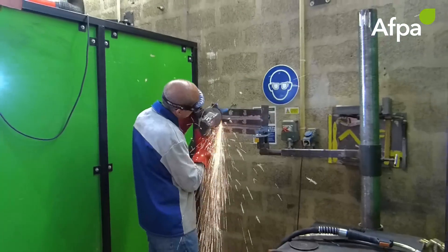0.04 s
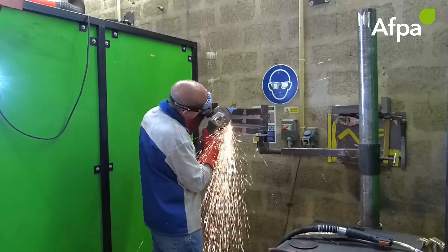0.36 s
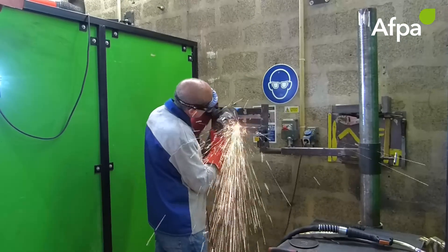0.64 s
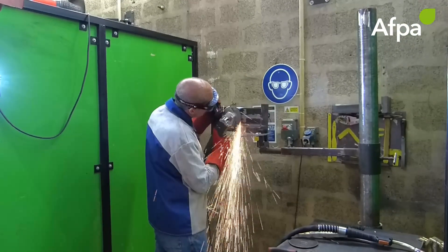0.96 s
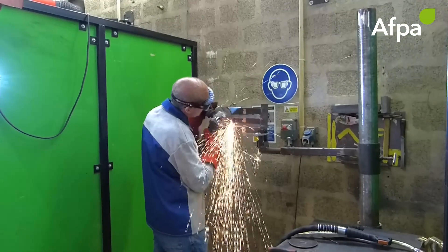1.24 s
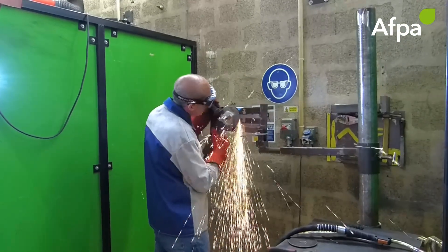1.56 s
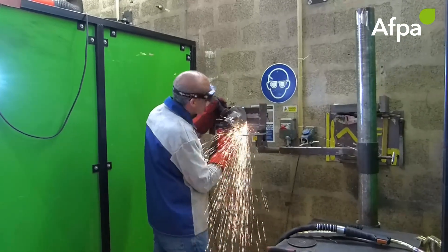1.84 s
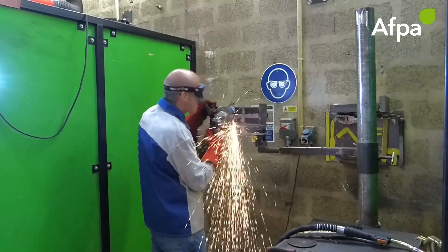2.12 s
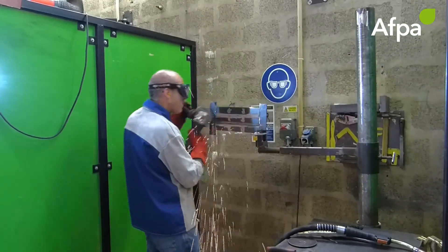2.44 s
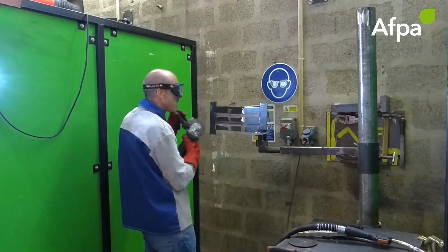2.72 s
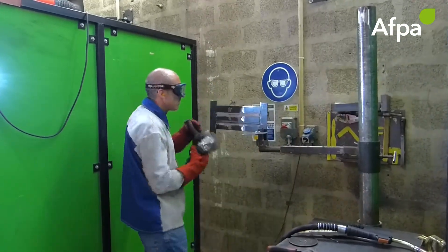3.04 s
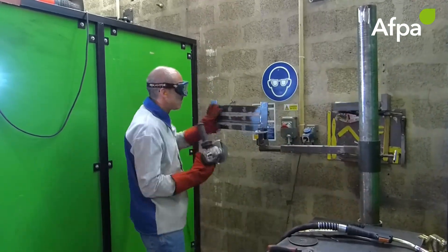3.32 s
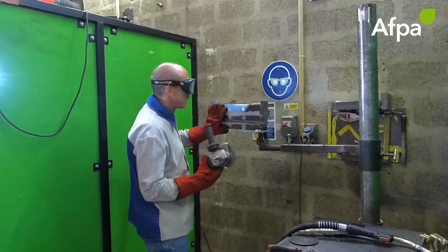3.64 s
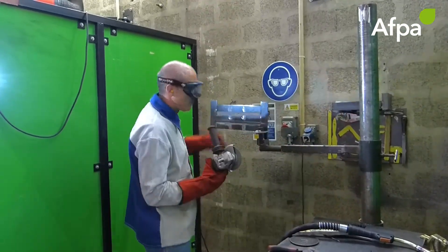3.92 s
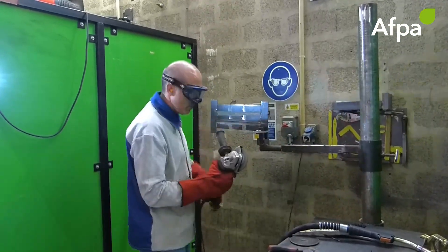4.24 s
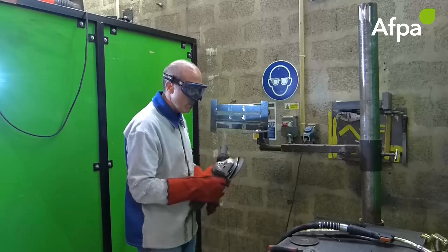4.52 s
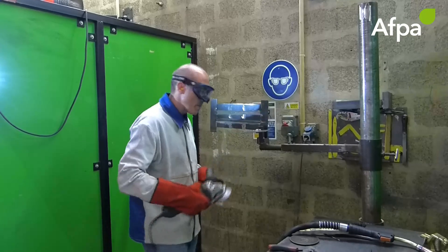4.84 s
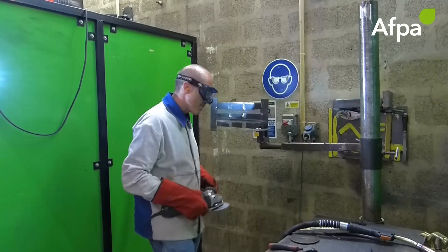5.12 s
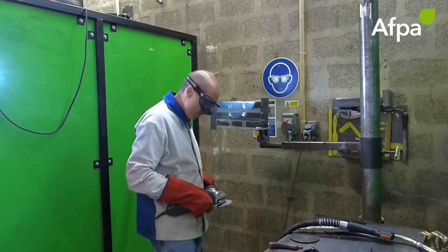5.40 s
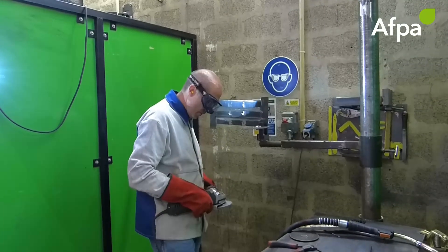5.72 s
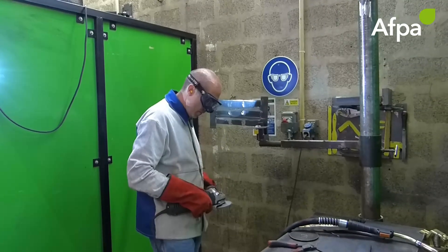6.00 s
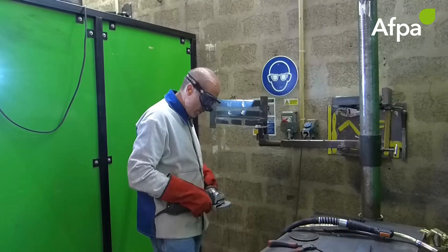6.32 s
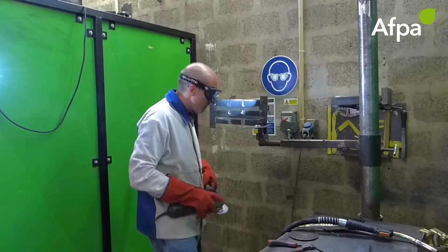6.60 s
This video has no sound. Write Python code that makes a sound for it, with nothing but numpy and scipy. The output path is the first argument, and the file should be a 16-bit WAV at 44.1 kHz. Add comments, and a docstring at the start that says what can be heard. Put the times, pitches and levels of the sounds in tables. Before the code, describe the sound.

Harsh grinding on metal in a workshop stops, and the grinder coasts down, whirring lower as its gears rattle and knock.

```python
"""An angle grinder bites into steel in a workshop with block walls. The disc scrapes once a turn, and its
harmonics (whole multiples of its speed) shriek in turn as the sagging speed slides them over the steel's
own notes. At 2.6 s it is lifted off and the steel rings out. Switched off, it coasts: fan air and gear
whine sink in pitch while the slack gears knock and rattle ever louder. Last, the worker shifts his grip."""
import sys
import numpy as np
from scipy import signal
from scipy.fft import rfft, irfft
from scipy.io import wavfile
from scipy.ndimage import map_coordinates

SR = 44100
rng = np.random.default_rng(int(sys.argv[2]) if len(sys.argv) > 2 else 0)


def transcribe(u):
    """Save the signal u as a 16-bit wav file named by the first command-line argument.

    u: samples, shape (n,) or (channels, n), limited to [-1, 1]; the rate is SR.
    q: integer samples, one column per channel.
    """
    v = np.clip(np.atleast_2d(u).T, -1, 1)
    q = np.round(v * 32767).astype(np.int16)
    wavfile.write(sys.argv[1], SR, q)


N = 302526
TIME = np.arange(N) / SR
LIFT_S, OFF_S = 2.587, 2.765  # the disc leaves the steel; the motor is switched off
TOUCHING, SINCE_LIFT = TIME < LIFT_S, np.maximum(TIME - LIFT_S, 0)


def amp(db):
    """Turns decibels into a gain."""
    return 10 ** (np.asarray(db) / 20)


def unit(x):
    """Scales a signal to an average power of 1."""
    return x / np.sqrt(np.mean(x ** 2) + 1e-20)


def curve(rows, column=1):
    """One column of a table, joined by straight lines in time."""
    rows = np.asarray(rows)
    return np.interp(TIME, rows[:, 0], rows[:, column])


def level_at(points, hz):
    """Looks up the level at a pitch, between the rows of a table."""
    pitches, levels = np.transpose(points)
    return np.interp(np.log(hz + 1), np.log(pitches), levels)


def colour(x, points, bumps=()):
    """Makes some pitches louder and others softer: a broad outline with narrow bumps on top."""
    hz = np.fft.rfftfreq(N, 1 / SR)
    bumps_db = sum(db / (1 + (2 * (hz - pitch) / width) ** 2) for pitch, width, db in bumps)
    return irfft(rfft(x) * amp(level_at(points, hz) + bumps_db), N)


def drift(rate_hz):
    """A smooth random wobble, about 1 in size."""
    coarse = np.arange(0, N + 48, 48)
    smooth = map_coordinates(rng.standard_normal(len(coarse)), [coarse / SR * rate_hz * 2], mode="wrap")
    return unit(np.interp(np.arange(N), coarse, smooth))


def resonate(x, hz, t60):
    """Rings at one pitch when pushed; t60 is the seconds it takes to fade by 60 dB."""
    r = amp(-60 / (t60 * SR))
    return signal.lfilter([1, 0, -1], [1, -2 * r * np.cos(2 * np.pi * hz / SR), r * r], x)


def room(x, t60, wet):
    """Dense echoes from the block walls; wet is their share of the power."""
    t = np.arange(SR // 2) / SR
    tail = rng.standard_normal(len(t)) * amp(-60 * t / t60) * (t > .004)
    return np.sqrt(1 - wet) * x + np.sqrt(wet) * signal.oaconvolve(x, tail / np.linalg.norm(tail))[:N]


def wander(x, depth_db=1.8, span_hz=200, span_s=0.07):
    """Random patches of the sound, high and low, brighten and dull."""
    hz, t, spectrum = signal.stft(x, SR, nperseg=1024, noverlap=768)
    field = rng.uniform(-1, 1, (256, 256))
    grid = np.meshgrid(hz / span_hz, t / span_s, indexing="ij")
    patches = unit(map_coordinates(field, grid, order=1, mode="wrap"))
    return signal.istft(spectrum * amp(depth_db * patches), SR, nperseg=1024, noverlap=768)[1][:N]


def swell(peak_s, length_s):
    """The samples around peak_s, and a gain that builds up and dies away over them."""
    near = np.flatnonzero(abs(TIME - peak_s) < 3 * length_s)
    return near, 1 / np.cosh(2.2 * (TIME[near] - peak_s) / length_s)


# How fast the disc spins while it grinds: time_s, turns_per_s
LOADED_SPEED = [(0.0, 141.0), (0.13, 141.9), (0.42, 141.3), (0.53, 140.2), (0.62, 139.9), (0.97, 137.9),
                (1.29, 137.0), (1.45, 137.6), (1.72, 135.8), (1.86, 135.3), (2.1, 137.3), (2.26, 136.4),
                (2.45, 134.8), (2.58, 135.4)]

def disc_speed(drag_s=4.78, friction_per_s=11.76):
    """Turns per second: the load sags the speed; after switch-off, drag and friction run it down."""
    friction = friction_per_s * drag_s
    return (curve(LOADED_SPEED) + friction) * np.exp(-np.maximum(TIME - OFF_S, 0) / drag_s) - friction


# The high hiss and the low bark of the scrape: time_s, level_db
HISS = [(0.0, -12), (0.08, -25.5), (0.11, -22.5), (0.16, -21), (0.25, -20.5), (0.85, -19.5), (0.95, -22),
        (1.31, -20), (1.39, -22), (1.57, -21), (1.85, -21.5), (2.04, -21.5), (2.12, -20), (2.58, -23.5)]
BARK = [(0.0, -23.5), (0.19, -32.5), (0.58, -24), (0.8, -38), (0.91, -32), (1.29, -27.5), (1.32, -30),
        (1.59, -29), (1.78, -27), (1.9, -26.5), (2.13, -25.5), (2.58, -29.5)]
# How the disc meets the steel: time_s, growl_db, repeating_share (of the scrape, 0 to 1)
CONTACT = [(0, -68.5, 0.73), (.45, -69, 0.32), (.75, -82, 0.82), (1, -56, 0.3), (1.35, -66, 0.85),
           (1.65, -62, 0.7), (1.95, -67.5, 0.26), (2.3, -71, 0.65), (2.6, -69, 0.03)]
# The tone of the scrape: pitch_hz, level_db
SCRAPE_TONE = [(100, -41), (330, -47), (490, -65), (570, -50), (750, -27), (1200, -15.5), (1600, -12.5),
               (2000, -5), (3300, -7), (5000, 4.5), (6700, 2.5), (8500, 2.5), (9700, -2.5), (11500, -5.5),
               (15000, -22.5)]
# Pitches that the disc and its guard boost or swallow: pitch_hz, width_hz, boost_db
DISC_BUMPS = [(1650, 200, -29), (2425, 120, -9.5), (2740, 190, 6.5), (3330, 110, -10), (4340, 110, 1.5),
              (4810, 110, -6), (4840, 170, 4.5), (5430, 110, 3.5), (5820, 80, 6.5), (6635, 620, 9),
              (8150, 740, 8), (8450, 250, -4), (9310, 970, 6.5), (9810, 92, 3)]

def scrape(turns, wear_s=0.1169, split_hz=3800):
    """Grit tears at the steel; the same rough rim returns each turn while wear slowly renews it."""
    harmonics = np.exp(2j * np.pi * rng.random((256, 160)))  # all equally strong
    patterns = unit(irfft(harmonics, 2560, axis=1))  # each row is once round the rim
    place = (turns % 1 * patterns.shape[1]).astype(int)
    age = TIME / wear_s
    step, blend = age.astype(int), np.pi / 2 * (age % 1)
    rim = np.cos(blend) * patterns[step, place] + np.sin(blend) * patterns[step + 1, place]
    repeating = curve(CONTACT, column=2)
    grit = np.sqrt(repeating) * rim + np.sqrt(1 - repeating) * rng.standard_normal(N)
    grit *= (1 + 0.1 * np.cos(2 * np.pi * turns)) * amp(1.8 * drift(45) + 0.2 * drift(6.25))
    grit = wander(room(grit, t60=0.24, wet=0.7))  # the point of contact wanders
    grit = colour(grit, SCRAPE_TONE, DISC_BUMPS)
    low = signal.sosfiltfilt(signal.butter(3, split_hz, fs=SR, output="sos"), grit)
    hiss = amp(curve(HISS) - 1.35) * unit(grit - low)
    bark = amp(curve(BARK) - 1.6) * unit(low)
    last_bite_db = 2 * np.exp(-((TIME - 2.54) / 0.022) ** 2)
    return (hiss + bark) * amp(last_bite_db - 60 * SINCE_LIFT / 0.61)


# The notes at which the steel and its clamp ring: pitch_hz, level_db, fade_s
STEEL_NOTES = [(1099, -49, .35), (1386, -48.5, .22), (1770, -48.5, 1.2), (2600, -43, .25), (2695, -41, .18),
               (2942, -44, .45), (3305, -47, .4), (3420, -46, .35), (3752, -42, .28), (4200, -47, .15),
               (4690, -43.5, 1.0), (5042, -43, .35), (5572, -44, .4), (6446, -41, .4), (6530, -40, .45),
               (6660, -37, .17), (7079, -43, .3), (7628, -45, .3), (8266, -41, .35), (8642, -41, .6),
               (9743, -42, .4)]

def steel_ring(push):
    """The grit's random pushes keep all the steel's notes ringing."""
    out, force = np.zeros(N), push * rng.standard_normal(N)
    for hz, db, t60 in STEEL_NOTES:
        note = resonate(force, hz, t60)
        out += amp(db) * note / note[TOUCHING].std()
    return amp(-1) * out


# The low tones of the growl: speed_multiple, relative_db
GROWL_TONES = [(1, -24), (2, -3), (3, -3), (4, 8.5), (6, 7), (8, 17.5), (10, 6)]

def growl(turns):
    """The harder the disc is pressed, the more it growls."""
    tones = sum(amp(db + 0.5 * drift(5.5)) * np.sin(2 * np.pi * k * turns) for k, db in GROWL_TONES)
    return tones * amp(curve(CONTACT) - 220 * SINCE_LIFT)


# How hard the disc's harmonics drive a note that they meet: pitch_hz, boost_db
SHRIEK_DRIVE = [(1100, -9), (1400, 4), (1800, 10.5), (2700, -0.5), (3400, 8), (3750, 0), (4200, 1),
                (5200, 14), (6600, 3), (9700, 6.5)]

def shrieks(speed, turns, push, damping_hz=7, slip_turns=0.005):
    """A note of the steel shrieks when a harmonic slides onto it; the roaming contact damps it."""
    out, loaded, span = np.zeros(N), speed[TIME < OFF_S], TIME < OFF_S + .5
    angle = 2 * np.pi * (turns + slip_turns * drift(30))[span]
    roam, flutter = amp(5 * drift(7.1))[span], amp(0.5 * drift(60))[span]
    for hz, db, t60 in STEEL_NOTES:
        multiples = range(round(hz / loaded.max()), round(hz / loaded.min()) + 1)
        shift, phase = rng.integers(N), 2 * np.pi * rng.random()
        force = push[span] * np.roll(roam, shift) * sum(np.sin(k * (angle + phase)) for k in multiples)
        width_hz = np.log(1000) / (np.pi * t60) + damping_hz
        note = np.pi * width_hz / SR * resonate(force, hz, t60=np.log(1000) / (np.pi * width_hz))
        out[span] += np.sqrt(2) * amp(db + level_at(SHRIEK_DRIVE, hz)) * np.roll(flutter, shift) * note
    return out


# Rough squeals of the rim on the steel: peak_s, length_s, pitch_hz, level_db
CHATTERS = [(0.043, 0.085, 2956, -35), (.05, 0.074, 8620, -24.5), (0.08, 0.065, 4230, -29),
            (0.074, .03, 6660, -19.5), (0.094, .04, 2700, -36), (0.134, 0.078, 3730, -29.5),
            (0.192, 0.069, 6590, -24.5), (0.253, 0.053, 3750, -31), (.45, 0.22, 3740, -33),
            (0.517, 0.16, 2640, -28), (0.575, .025, 3770, -33), (0.626, 0.041, 8310, -22.5),
            (.86, 0.083, 6650, -22.5), (1.09, 0.029, 6660, -29), (1.161, 0.028, 8260, -23.5),
            (1.24, 0.049, 6720, -30), (1.28, 0.022, 5050, -25), (1.445, 0.059, 3790, -30.5),
            (1.627, 0.057, 4220, -30), (1.805, 0.13, 6680, -22), (1.826, 0.066, 2650, -31.5),
            (1.85, 0.16, 5610, -27), (1.856, .06, 5000, -31), (2.026, 0.36, 2950, -36),
            (2.105, 0.027, 5050, -25.5), (2.134, 0.1, 6560, -24), (2.18, 0.047, 3770, -30),
            (2.3, 0.073, 8400, -24.5), (2.37, 0.03, 8010, -22.5), (2.46, 0.026, 3740, -27),
            (2.453, 0.037, 6610, -29), (2.537, 0.032, 6630, -27), (2.593, 0.099, 4740, -34)]

def chatter(turns, uneven_db=3, slip_turns=0.013):
    """The rim hammers the steel once a turn, unevenly, so that one note stutters."""
    out = np.zeros(N)
    strikes = np.diff(np.floor(turns + slip_turns * drift(60)), prepend=0) * amp(uneven_db * drift(70))
    for peak_s, length_s, hz, db in CHATTERS:
        near, shape = swell(peak_s, length_s)
        out[near] += amp(db) * shape * unit(resonate(strikes[near], hz, t60=0.15))
    return out


# Clean tones that swell and fade, loud shrieks and one faint low growl:
# peak_s, length_s, speed_multiple, level_db
CATCHES = [(0.154, 0.024, 50, -20.5), (0.387, 0.065, 19, -25.5), (.47, 0.11, 8, -39),
           (0.576, 0.11, 21, -26), (.66, 0.088, 21, -22.5), (0.664, 0.36, 14, -35.5),
           (0.673, 0.21, 13, -37), (0.743, 0.065, 40, -22), (0.786, 0.07, 36, -30), (.8, 0.28, 15, -36.5),
           (0.83, 0.035, 47, -23), (.85, 0.035, 27, -27), (.85, 0.1, 41, -24.5), (0.857, 0.08, 48, -29),
           (.91, 0.056, 22, -32), (0.96, 0.12, 20, -28), (1.004, 0.08, 8, -32), (1.006, 0.16, 28, -29.5),
           (1.07, 0.13, 10, -35), (1.217, 0.045, 47, -21.5), (1.234, 0.088, 13, -29.5),
           (1.287, 0.28, 71, -30.5), (1.307, 0.076, 63, -20.5), (1.342, 0.053, 19, -24.5),
           (1.394, 0.16, 8, -35.5), (1.422, 0.04, 19, -25.5), (1.507, .08, 19, -31.5),
           (1.524, 0.043, 71, -24), (1.54, 0.12, 8, -34.5), (1.57, 0.15, 41, -25), (1.594, .035, 42, -24.5),
           (1.657, 0.11, 37, -23.5), (1.672, 0.17, 13, -29.5), (0.54, 0.47, 10, -43.5),
           (1.766, 0.074, 20, -24), (1.95, 0.42, 3, -60.5), (1.963, 0.19, 8, -38.5),
           (2.034, 0.25, 19, -28.5), (2.193, .025, 47, -28), (2.245, 0.037, 56, -25),
           (2.25, 0.045, 37, -21), (2.273, 0.062, 13, -25)]

def catches(turns, waver_db=1.5, slip_turns=0.001):
    """The disc catches and one harmonic swells and fades; its jitter blurs the high ones most."""
    out, flutter, wobble = np.zeros(N), waver_db * drift(45), slip_turns * drift(30)
    for peak_s, length_s, multiple, db in CATCHES:
        near, shape = swell(peak_s, length_s)
        elsewhere = (near + rng.integers(N)) % N  # each tone wavers in its own way
        cycles = multiple * (turns[near] + wobble[elsewhere]) + rng.random()
        out[near] += np.sqrt(2) * amp(db + flutter[elsewhere]) * shape * np.sin(2 * np.pi * cycles)
    return out


def last_ring(rise_s=.008, sustain=1.6):
    """The rim snags the edge as it leaves; freed of the disc, the steel rings longer."""
    out = np.zeros(N)
    for hz, db, t60 in STEEL_NOTES:
        fade = amp(db - 60 * SINCE_LIFT / (sustain * t60)) * np.sqrt(t60)
        out += fade * np.sin(2 * np.pi * (hz * SINCE_LIFT + rng.random()))
    return amp(1) * (1 - np.exp(-(SINCE_LIFT / rise_s) ** 2)) * out


# The tone of the fan air: pitch_hz, level_db
AIR_TONE = [(100, -29), (330, -35.5), (560, -3), (1000, 0.5), (1800, 4.5), (2900, 1), (4500, 3), (6000, 3),
            (7800, 4.5), (9200, -1), (10500, -7), (15000, -26.5)]
# Pitches that the gear head and the vents, with the guard, bring out: pitch_hz, width_hz, boost_db
HEAD_BUMPS = [(224, 20, 6), (840, 170, 5.5), (2120, 260, 9.5), (3170, 220, 5.5), (3685, 40, 7.5),
              (3900, 600, 4.5), (4770, 180, 4), (4940, 230, 5.5), (6460, 370, 4), (7470, 67, 6),
              (9700, 300, -0.5)]
VENT_BUMPS = [(517, 88, 1.5), (740, 33, 2), (855, 29, 1), (960, 80, -2.5), (1100, 160, 1), (1360, 200, 1),
              (4000, 250, 4)]
# Air rings the head less than blows do.
HOUSING_BUMPS = [(hz, width, 0.25 * db) for hz, width, db in HEAD_BUMPS] + VENT_BUMPS

def fan_air():
    """The fan blows rushing air past the gear head and vents."""
    rush = room(rng.standard_normal(N), t60=0.16, wet=0.19)
    rush = wander(rush, depth_db=1.5, span_hz=238.4, span_s=.14)
    return unit(colour(rush, AIR_TONE, HOUSING_BUMPS))


# Fuzzy whirrs of fan and gears: peak_s, length_s, speed_multiple, width_hz, level_db
WHIRRS = [(3.048, 0.56, 15.8, 400, -47.5), (3.5, 0.61, 13.3, 403, -54), (4.043, 0.75, 12, 380.4, -50),
          (4.598, 0.54, 11.5, 239, -53.5), (5.107, 1, 12, 339.5, -48.5), (3.6, 0.82, 39, 323, -48.5),
          (3.6, .4, 74, 1505, -42), (4.203, 0.54, 90, 2004, -42), (4.917, 1, 34, 610, -46.5),
          (5.87, 1, 38, 390, -47.5), (4.8, 0.98, 70, 602, -49), (5.1, 0.98, 6, 260.5, -58.5)]

def whirrs(turns):
    """Swirling air and gear teeth make narrow bands of noise that sink with the speed."""
    out = np.zeros(N)
    for peak_s, length_s, multiple, width_hz, db in WHIRRS:
        angle = 2 * np.pi * multiple * turns
        band = drift(width_hz / 2) * np.cos(angle) + drift(width_hz / 2) * np.sin(angle)
        out += amp(db) * np.exp(-2 * ((TIME - peak_s) / length_s) ** 2) * band
    return colour(room(out, t60=0.26, wet=0.29), [(400, -6.5), (750, 2.5), (9000, 0)], HOUSING_BUMPS)


# The whine of the gears: time_s, main_tone_db, octave_db
WHINE = [(3.4, -68, -63), (3.8, -48, -61), (4.2, -60, -61), (4.9, -61, -53.5), (5.36, -54, -50),
         (5.47, -51, -39.5), (5.54, -52, -42), (5.6, -53, -34), (5.68, -54, -48), (6.22, -55, -49),
         (6.32, -57, -37), (6.5, -60, -36), (6.6, -64, -48)]

def gear_whine(turns, big_gear_teeth=40, motor_teeth=12):
    """Meeting teeth sing a tone and its octave; the motor's spin adds a weak tone on either side."""
    def tone(multiple):
        """One wavering multiple of the disc speed."""
        level = np.sqrt(2) * amp(3 * drift(40))
        return level * np.sin(2 * np.pi * multiple * (turns + 0.003 * drift(30)))
    out, motor_ratio = np.zeros(N), big_gear_teeth / motor_teeth
    for k in (1, 2):
        side_tones = tone(k * (big_gear_teeth - motor_ratio)) + tone(k * (big_gear_teeth + motor_ratio))
        out += amp(curve(WHINE, column=k)) * (tone(k * big_gear_teeth) + amp(-11) * side_tones)
    return out


# The tone of loose teeth striking: pitch_hz, level_db
RATTLE_TONE = [(100, -32), (400, -15), (800, -5.5), (1600, -1.5), (2600, 0), (3500, 3), (5500, 3.5),
               (7600, 5), (9000, -3.5), (11500, -13.5), (15000, -35)]
# Single hard knocks: start_s, clack_db, ring_pitch_hz, ring_db
KNOCKS = [(3.475, -19, 7500, -31), (3.541, -32, 7340, -27), (5.767, -18, 3170, -24),
          (5.853, -13, 4820, -23), (5.998, -9.5, 4920, -18), (6.028, -20, 3200, -28), (6.05, -9, 4920, -26),
          (6.102, -11, 3660, -22), (6.156, -15, 3120, -22.5), (6.183, -17, 3700, -23.5),
          (6.244, -14, 3220, -27), (6.272, -22, 4800, -23), (6.294, -23, 5150, -26),
          (6.356, -10, 3740, -19.5), (6.415, -14, 3990, -22), (6.452, -12, 3700, -19),
          (6.508, -14, 4890, -16.5), (6.518, -17, 3000, -24), (6.54, -14, 2150, -31),
          (6.586, -9, 6550, -14.5), (6.589, -22, 2670, -20), (6.603, -28, 2160, -21),
          (6.622, -14, 2136, -25), (6.654, -3.5, 2980, -17), (6.678, -18, 4160, -18),
          (6.729, -6.5, 4180, -17.5), (6.771, -16, 3750, -13), (6.783, -25, 3780, -23),
          (6.841, -18, 4760, -20)]

def knocks(rise_s=0.0065, decay_s=0.0057, ring_rise_s=0.003, ring_t60=0.058):
    """The slack gears clack, and each clack leaves a metal part ringing briefly."""
    clacks, rings = np.zeros(N), np.zeros(N)
    for start_s, clack_db, hz, ring_db in KNOCKS:
        t = np.maximum(TIME - start_s, 0)
        clacks += amp(clack_db) * (1 - np.exp(-t / rise_s)) * np.exp(-t / decay_s)
        ring_level = (1 - np.exp(-t / ring_rise_s)) * amp(ring_db - 60 * t / ring_t60)
        rings += ring_level * np.sin(2 * np.pi * hz * t)
    return amp(-7) * clacks * unit(colour(rng.standard_normal(N), RATTLE_TONE, HEAD_BUMPS)) + rings


def gear_rattle(turns, pings_per_note_s=9):
    """Loose teeth strike in uneven bursts, hardest once a turn, and ping the gear head's many notes."""
    bursts = rng.standard_normal(N) * amp(0.84 * drift(40) + 0.25 * drift(510))
    pings = np.zeros(N)
    for hz in np.geomspace(2100, 6000, 40):
        blows = np.zeros(N)
        when, size, chance = rng.random((3, 200))
        blows[(when * N).astype(int)] = size * (chance < pings_per_note_s * N / SR / len(when))
        pings += resonate(blows, hz * rng.uniform(0.91, 1.02), t60=0.057)
    teeth = (bursts + amp(-12) * unit(pings)) * (1 + 0.14 * np.cos(2 * np.pi * turns))
    return unit(colour(room(teeth, t60=0.81, wet=0.36), RATTLE_TONE, HEAD_BUMPS))


def air_to_rattle(speed, turns, tight_speed=80, loose_speed=60):
    """Below tight_speed, fan air gives way to rattle; below loose_speed, the sound grows louder."""
    slack = np.clip((tight_speed - speed) / 38, 0, 1)
    level = amp(-34.5 + 0.2649 * np.maximum(loose_speed - speed, 0))
    return level * (np.sqrt(1 - slack) * fan_air() + np.sqrt(slack) * gear_rattle(turns))


def grip_bump(peak_s=6.74, length_s=0.11):
    """A soft, low bump as the worker shifts his grip."""
    tone = [(40, -20), (130, 2), (330, -6), (480, -21), (1500, -50)]
    thud = unit(colour(rng.standard_normal(N), tone, bumps=[(330, 46, 27)]))
    return amp(-57) * np.exp(-2 * ((TIME - peak_s) / length_s) ** 2) * thud


# The tone of the room's faint, steady noise: pitch_hz, level_db
ROOM_TONE = [(20, -4), (60, 0), (150, 0.5), (300, 4), (700, 12), (3000, -37), (15000, -41)]
# How loud the sides are next to the middle: pitch_hz, side_db
ROOM_WIDTH = [(50, -5), (300, -4), (700, -9), (2500, -9), (5500, -10.5), (9000, -25.5), (10500, -32),
              (12000, -58)]

def scene():
    """The grinder is straight ahead; the walls spread its sound to the sides."""
    speed = disc_speed()
    turns = np.cumsum(speed) / SR
    bite = amp(curve(HISS))
    push = bite / bite[TOUCHING].mean() * amp(-400 * SINCE_LIFT)  # the disc's force on the steel
    mid = scrape(turns) + steel_ring(push) + growl(turns) + shrieks(speed, turns, push)
    mid += catches(turns) + chatter(turns) + last_ring()
    mid += air_to_rattle(speed, turns) + whirrs(turns) + gear_whine(turns) + knocks() + grip_bump()
    mid += amp(-63.5) * unit(colour(rng.standard_normal(N), ROOM_TONE))
    side = colour(room(mid, t60=0.22, wet=1), ROOM_WIDTH)
    return np.array([mid + side, mid - side])


def record(dry):
    """Cuts away the very highest treble."""
    low_pass = signal.firwin(511, 15350, window=("kaiser", 9), fs=SR)
    return signal.oaconvolve(dry, low_pass[None], "same")


dry = scene()
out = record(dry)
transcribe(out)
```